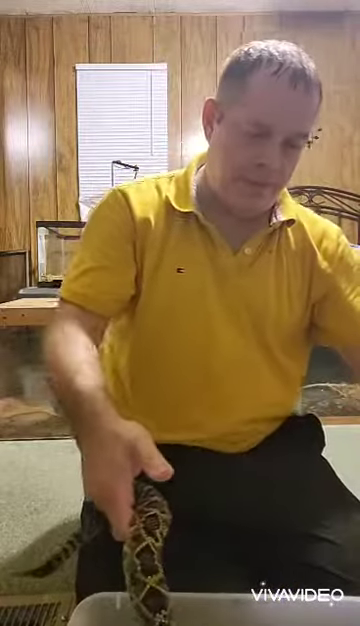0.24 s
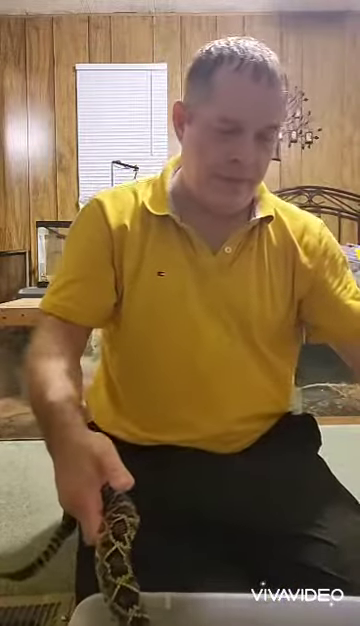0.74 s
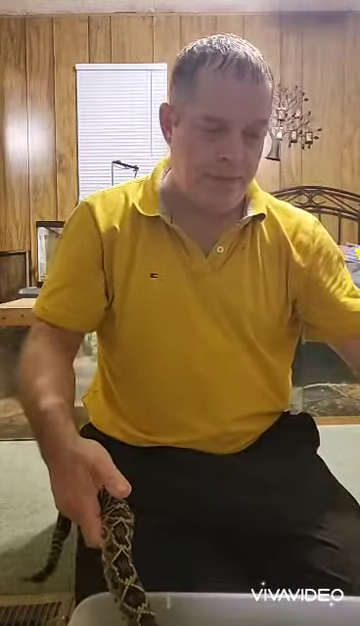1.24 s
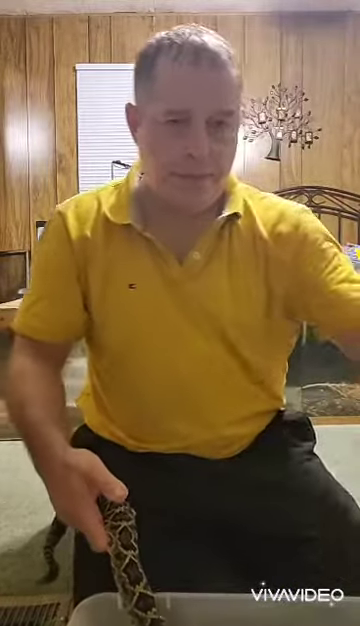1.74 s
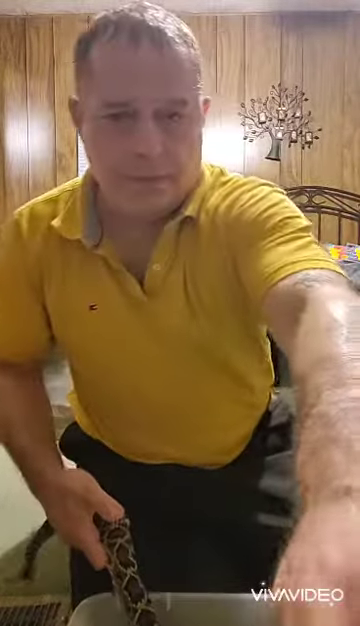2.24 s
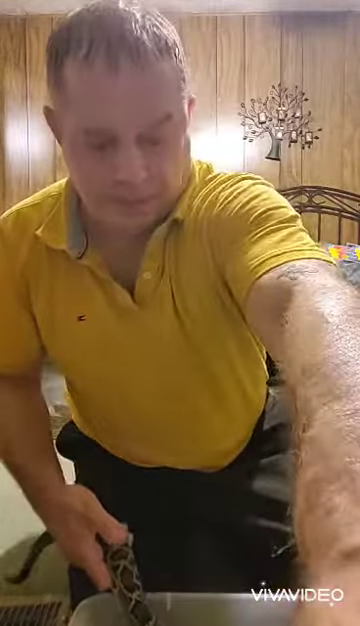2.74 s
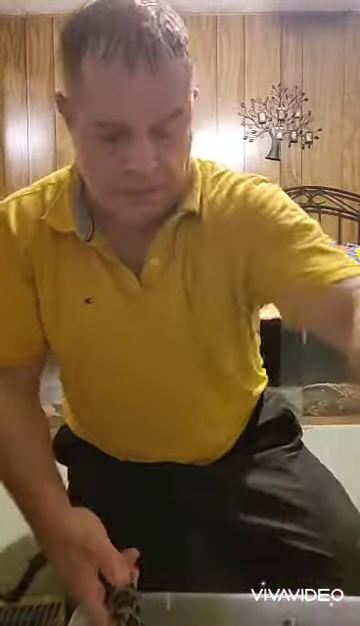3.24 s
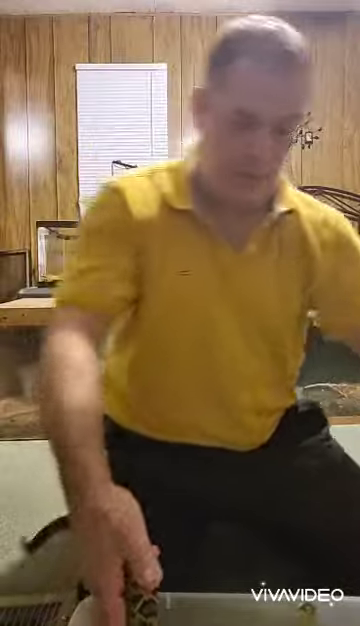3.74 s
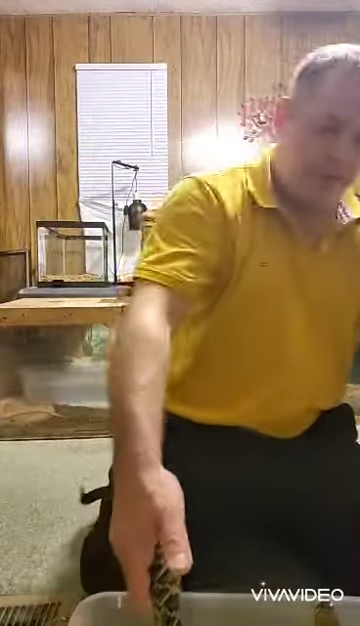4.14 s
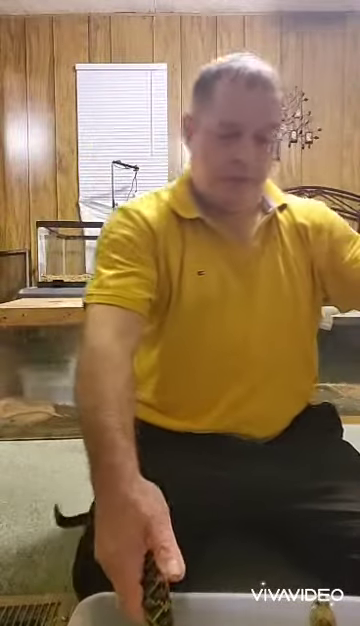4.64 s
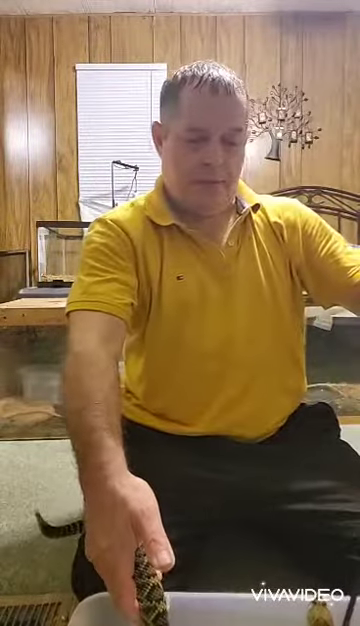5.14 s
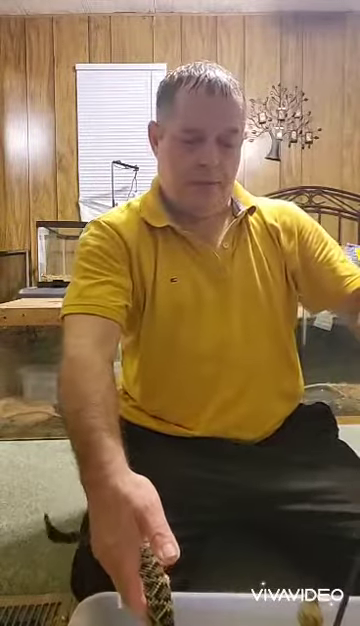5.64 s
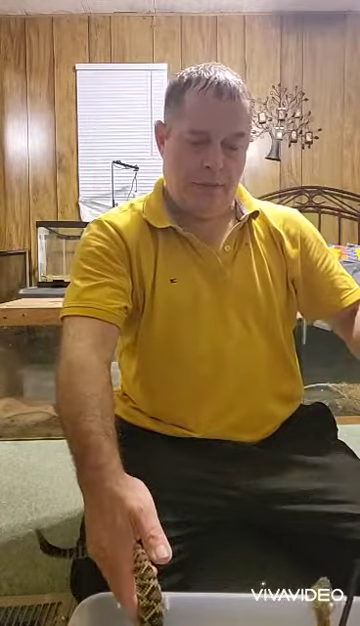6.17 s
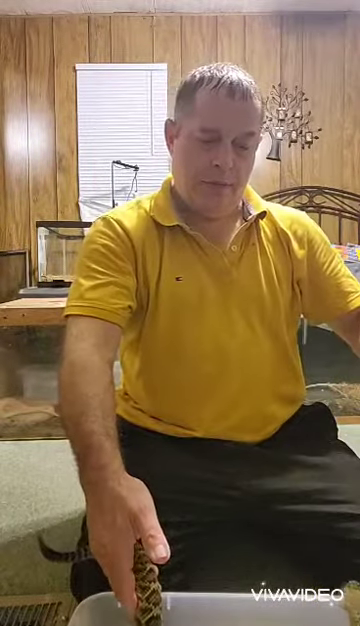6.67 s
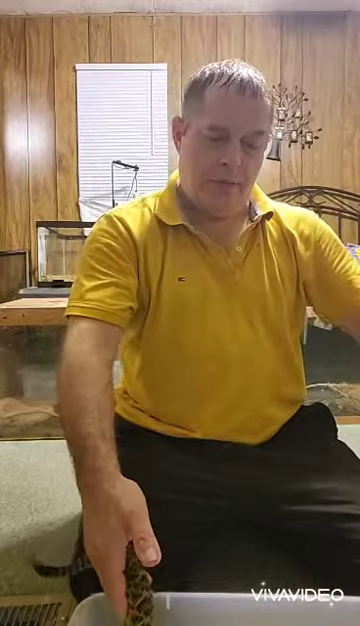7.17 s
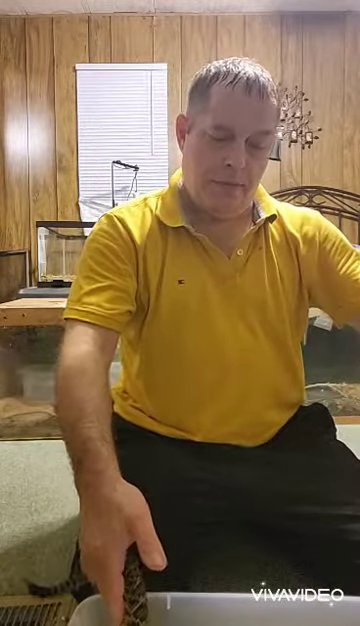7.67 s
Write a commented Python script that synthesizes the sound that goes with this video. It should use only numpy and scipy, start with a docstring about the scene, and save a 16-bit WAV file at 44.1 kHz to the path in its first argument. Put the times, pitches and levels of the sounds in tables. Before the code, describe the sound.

Close stereo pickup indoors: soft drags, dry swishes and light scrapes over low motor rumble, then a sharp hollow plastic knock. The snake's tail twitches, quickly building into a steady bright rattle of about twenty flicks a second, slightly toward the right. Several tub bumps and brief rubs fall under it, then mostly the rattle alone, thinner and less even at the close.

```python
"""Rattlesnake over a plastic tub

A rattlesnake, held over a plastic tub in a small panelled room, starts to rattle.
About twenty tail flicks a second throw loose horny segments together: trains of impacts excite resonances.
Knocks ring the modes of the tub; friction noise makes the drag of sleeve and hand, swishes and scrapes,
then a long faint rustle under the rattle. Machines hum underneath as wavering sines over low rumble."""
import sys
import numpy as np
from scipy import signal
from scipy.fft import rfft, irfft
from scipy.io import wavfile

SR = 44100
rng = np.random.default_rng(int(sys.argv[2]) if len(sys.argv) > 2 else 0)


def unload_wav(signal):
    """Save mono or channel-first audio to the path in sys.argv[1] as 16-bit WAV at rate SR, clipped to [-1, 1]."""
    wavfile.write(
        sys.argv[1],
        SR,
        np.round(np.clip(np.atleast_2d(signal).T, -1, 1) * 32767).astype(np.int16),
    )


N = 348831
TIME = np.arange(N) / SR


def amp(db):
    """Level: decibels to amplitude gain."""
    return 10 ** (np.asarray(db) / 20)


def unit(x):
    """Normalisation: scales to rms 1."""
    return x / np.sqrt(np.mean(x ** 2) + 1e-20)


def read(points, hz):
    """Interpolation: reads a curve on a log-frequency axis."""
    f, value = np.transpose(points)
    return np.interp(np.log(hz + 1), np.log(f + 1), value)


def pan(db):
    """Interaural level difference: left and right gains for left minus right dB."""
    return amp(np.array([[.5], [-.5]]) * db)


def add(mix, s, sound):
    """Superposition: mixes a sound in at time s."""
    part = mix[..., max(round(s * SR), 0):][..., :sound.shape[-1]]
    part += sound[..., :part.shape[-1]]


def drift(hz):
    """Low-pass noise: slow random change of rms 1, up to the given rate."""
    lowpass = 1 + (np.fft.rfftfreq(N, 1 / SR) / hz) ** 4
    return unit(irfft(rfft(rng.standard_normal(N)) / lowpass, N))


def colour(x, points, size=4096):
    """Minimum-phase filtering: a causal filter of energy 1 with the given spectrum."""
    hz = abs(np.fft.fftfreq(size, 1 / SR))
    log_gain = np.log(amp(np.maximum(read(points, hz), -100)))
    spectrum = np.exp(signal.hilbert(log_gain).conj())
    taps = np.fft.ifft(spectrum).real[:size // 2]
    taps = taps[None] / np.linalg.norm(taps)
    return signal.oaconvolve(np.atleast_2d(x), taps, axes=1)[:, :x.shape[-1]]


def tilted(x, tilt_db, pivot_hz=1000):
    """Spectral tilt: brighter or duller by a slope per octave, level outside 200-5000 Hz."""
    hz = np.clip(np.fft.rfftfreq(N, 1 / SR), 200, 5000)
    return irfft(rfft(x) * amp(tilt_db * np.log2(hz / pivot_hz)), N)


def excite(train, ring):
    """Convolution: plays a ring, scaled to energy 1, on every impact of a train."""
    ring = np.atleast_2d(ring)
    ring = ring / np.linalg.norm(ring, axis=1, keepdims=True)
    return signal.oaconvolve(np.atleast_2d(train), ring, axes=1)[:, :N]


# decay of the panelled room: (frequency [Hz], t60 [s])
ROOM_DECAY = [(200, 0.17), (600, 0.15), (1400, 0.15), (4000, 0.22), (9000, 0.23), (15000, 0.22)]


def room(x, wet_db, apart_hz=1100, size=16000):
    """Reverberation: dense reflections decay band by band; both microphones share the bass."""
    taps = rng.standard_normal((2, size)) * (rng.random((2, size)) < .15)
    taps[:, :round(.003 * SR)] = 0  # no reflection in the first 3 ms
    hz, t, bands = signal.stft(taps, SR, nperseg=256)
    same = 1 / (1 + (hz[:, None] / apart_hz) ** 4)
    bands[1] = same * bands[0] + np.sqrt(1 - same ** 2) * bands[1]
    decay = amp(-60 * t / read(ROOM_DECAY, hz)[:, None])
    tail = signal.istft(bands * decay, SR, nperseg=256)[1]
    wet = signal.oaconvolve(x, tail / np.linalg.norm(tail[0]), axes=1)[:, :N]
    return (x + amp(wet_db) * wet) / np.sqrt(1 + amp(wet_db) ** 2)


# diffuse sound at the two microphones: (frequency [Hz], left-right likeness [0-1])
DIFFUSE_LIKENESS = [(60, 1), (600, 0.61), (1200, 0.01), (4000, 0.012)]


def diffuse(x, spectrum):
    """Diffuse-field coherence: two unrelated signals become coloured sound from all round, rms 1."""
    hz = np.fft.rfftfreq(N, 1 / SR)
    a, b = rfft(x)
    same = np.clip(read(DIFFUSE_LIKENESS, hz), 0, 1)
    pair = np.array([a, same * a + np.sqrt(1 - same ** 2) * b])
    return unit(irfft(pair * amp(read(spectrum, hz)), N))


# motor hum: (frequency [Hz], mean amplitude before panning [dB])
HUM_TONES = [(58.3, -47.5), (87.3, -63), (120, -57), (240, -68.5)]
# spectrum of the room's low rumble: (frequency [Hz], relative level per Hz [dB])
RUMBLE_SPECTRUM = [(24, -37), (31, -25), (38, -4.5), (45, 7.5), (58, 1), (70, -1.5), (95, 1.5), (140, -9),
                   (190, -14.5), (280, -15), (360, -29.5), (650, -33), (1100, -33.5), (3000, -41),
                   (15500, -48)]


def machines(rumble_db=-54.5, waver_rad=0.53):
    """Phase modulation: a wavering motor hum over the low rumble of the room."""
    hum = np.zeros(N)
    for hz, db in HUM_TONES:
        level = amp(db + 0.21 * drift(2.0))
        phase = 2 * np.pi * (hz * TIME + rng.random()) + waver_rad * drift(0.82)
        hum += level * np.sin(phase)
    rumble = amp(rumble_db) * diffuse(rng.standard_normal((2, N)), RUMBLE_SPECTRUM)
    return pan(1.65) * (hum + rumble)


# what the tub rings with: (frequency [Hz], relative level [dB], t60 [s])
TUB_MODES = [(228, -25, 0.17), (306, -4.5, 0.041), (476, -17, 0.07), (615, 2, 0.069), (671.5, 2.5, 0.056),
             (819, -8, 0.1), (993, -15, 0.071), (1235, -16.5, 0.1), (1420, -32, 0.05), (1675, -16.5, 0.044),
             (2100, -12.5, 0.068)]


def tub_ring(tilt_db, pivot_hz=615):
    """Modal synthesis: the tub after one blow, brighter or duller by a tilt per octave."""
    t = np.arange(SR // 4) / SR
    ring = np.zeros(len(t))
    for k, (hz, db, t60) in enumerate(TUB_MODES):
        decay = amp(db + tilt_db * np.log2(hz / pivot_hz) - 60 * t / t60)
        ring += decay * np.sin(2 * np.pi * hz * t + k * np.pi)  # signs alternate
    return ring


def slips(per_s, uneven_db):
    """Stick-slip friction: tiny random slips of a surface pressed now harder and now softer."""
    happens = rng.random(N) < per_s / SR
    return rng.standard_normal((2, N)) * happens * amp(uneven_db * drift(24.0))


def strokes(rows, rise_s, fade_s):
    """Amplitude envelope: each stroke sets in, grows steadily stronger or weaker, and dies away."""
    gain = np.zeros(N)
    for start, length, db, change_db in rows:
        t = TIME - start
        rise = np.clip(t / rise_s, 0, 1)
        strength = amp(db + change_db * np.clip(t / length, 0, 1))
        gain += rise * strength * np.exp(-np.maximum(t - length, 0) / fade_s)
    return gain


# hand and sleeve dragging along, then (last two rows) a long faint rustle under the rattle:
# (start [s], length [s], relative level [dB], change over the stroke [dB], brightness [dB per octave])
DRAG_AND_RUSTLE_STROKES = [(0, 0.47, -60.5, -3, 1.5), (0.888, 0.63, -63, -8.5, 0.5),
                           (2.32, 0.18, -61, 1.5, -4), (2.487, 0.76, -45, -10, 2),
                           (3.288, 0.28, -50.5, 6, -1), (3.96, 0.15, -69, 14.5, -1.5),
                           (4.119, 0.14, -50.5, 3, 0.5), (4.781, 0.029, -45, -6, 3),
                           (4.863, 2.21, -68, 4, 2), (7.0, 0.91, -95, 32.5, -1)]
# spectrum of the drag and rustle: (frequency [Hz], relative level per Hz [dB])
DRAG_AND_RUSTLE_SPECTRUM = [(100, 13), (230, 5), (340, 4.5), (470, 8.5), (550, 1), (630, 8), (780, -3),
                            (950, -0.5), (1270, 2), (1750, 4), (2120, 3.5), (2400, -4), (3500, -2),
                            (9000, -13)]


def drag_and_rustle(gain_db=-3.0, ring_db=-7, ring_tilt_db=12, echo_s=0.0044, sway_s=0.000445):
    """Comb filtering: dull rubbing noise, with some tub ringing, meets its own drifting echo."""
    rub = diffuse(slips(per_s=9000, uneven_db=1.2), DRAG_AND_RUSTLE_SPECTRUM)
    ring = unit(excite(slips(per_s=3700, uneven_db=4.5), tub_ring(ring_tilt_db)))
    rub = rub + amp(ring_db) * ring
    delay = echo_s + sway_s * drift(1.0)  # the near reflection shifts slowly
    echo = np.array([np.interp(TIME - delay, TIME, side) for side in rub])
    rub = unit(rub + .3 * echo)
    out = np.zeros((2, N))
    for *row, tilt_db in DRAG_AND_RUSTLE_STROKES:
        out += strokes([row], rise_s=0.021, fade_s=0.07) * tilted(rub, tilt_db)
    return pan(2.5) * amp(gain_db) * out


# dry swishes of cloth and scales: (start [s], length [s], level [dB], change over the stroke [dB])
SWISH_STROKES = [(-.05, 0.37, -62.5, -3.5), (.9, 0.16, -68.5, -3), (1.78, 0.69, -68, -4)]
# spectrum of the swish: (frequency [Hz], relative level per Hz [dB])
SWISH_SPECTRUM = [(2500, -14), (4300, -9), (5200, -0.5), (7600, 5.5), (9500, -19.5), (15500, -5)]


def swish():
    """Friction noise: many light slips of cloth and scales, faint, dry and bright."""
    rub = diffuse(slips(per_s=9000, uneven_db=1.5), SWISH_SPECTRUM)
    return pan(-11.0) * strokes(SWISH_STROKES, rise_s=0.12, fade_s=0.47) * rub


# the snake's body scraping on the rim of the tub: (start [s], length [s],
# relative level [dB], change over the stroke [dB])
SCRAPE_STROKES = [(0, 0.12, -59.5, -9), (.26, 0.061, -64.5, 1.5), (.99, 0.11, -72, 22.5)]
# spectrum of the scrape's noise: (frequency [Hz], relative level per Hz [dB])
SCRAPE_SPECTRUM = [(300, -2), (650, -2), (900, -6), (1200, -15), (1650, -7), (3000, -31)]


def scrape():
    """Friction-excited resonance: slips of the scales ring the tub, with noise beside the ring."""
    ring = unit(excite(slips(per_s=890, uneven_db=5.0)[0], tub_ring(0)))
    rub = diffuse(slips(per_s=1500, uneven_db=2.0), SCRAPE_SPECTRUM)
    return pan(2.5) * strokes(SCRAPE_STROKES, rise_s=0.0061, fade_s=0.057) * (ring + rub)


# knocks on the tub: (time [s], relative level [dB], brightness [dB per octave],
# left minus right [dB], chatter of the contact [s], relative ring of the walls [dB],
# resonance of the struck spot [Hz], height of that resonance [dB])
TUB_KNOCKS = [(0.442, -37.5, -2.5, 6, 0.0093, -18, 925, 21),
              (1.096, -11.5, -1, 1.5, 0.0038, -14.5, 2140, 7),
              (1.112, -25.5, -3.5, -3, 0.004, -17.5, 300, 2), (2.011, -44, -2, 2, 0.0084, -30, 1230, 23),
              (2.466, -28, -2.5, 3, 0.012, -29, 452, 12), (2.496, -25.5, -3.5, 7, 0.012, -24, 1290, 22.5),
              (2.505, -22.5, -3.5, -4, 0.0064, -20, 550, 13), (3.99, -35.5, -11, 2, 0.012, -25, 192, 9),
              (4.148, -17.5, -1.6, 2, 0.0064, -13.5, 990, 6.5), (4.203, -32, 0.5, 1, 0.0097, -22, 1900, 1),
              (4.795, -23, -1.5, 1.5, 0.0097, -20, 1680, 9), (4.8, -32.5, -4, 0, 0.024, -42, 134, 22)]
# spectrum of the contact: (frequency [Hz], relative level per Hz [dB])
CRACK_SPECTRUM = [(100, 4), (300, 5), (850, 2), (1400, -5), (3000, -6), (5000, -4.5), (7800, -6.5),
                  (9500, -32), (15500, -34)]


def knocks(crack_db=-12, spot_octaves=0.26):
    """Impact excitation: a blow cracks on the plastic and rings the walls of the tub."""
    t, rings, cracks = np.arange(SR // 4) / SR, np.zeros((2, N)), np.zeros((2, N))
    hz = np.geomspace(100, 15500, 120)
    for s, db, tilt_db, side_db, crack_s, ring_db, spot_hz, spot_db in TUB_KNOCKS:
        spot = spot_db * np.exp(-(np.log2(hz / spot_hz) / spot_octaves) ** 2)
        shape = read(CRACK_SPECTRUM, hz) + tilt_db * np.log2(hz) + spot
        # partly the same noise on both sides
        noise = rng.standard_normal(len(t)) + .5 * rng.standard_normal((2, len(t)))
        crack = colour(noise * np.exp(-t / crack_s), list(zip(hz, shape)))
        add(cracks, s, amp(db + crack_db) * pan(side_db) * crack)
        add(rings, s, amp(db + ring_db) * pan(side_db) * tub_ring(tilt_db))
    return room(cracks, wet_db=4.0) + room(rings, wet_db=-13.5)


# single hard clacks of the segments: (time [s], relative peak level [dB])
SEGMENT_CLACKS = [(2.7282, -22), (2.7816, -31), (3.2562, -31), (3.3405, -22), (3.387, -27), (5.3146, -27)]
# resonances of the hollow segments: (frequency [Hz], relative level [dB])
HOLLOW_MODES = [(6600, -8), (7250, -19), (7700, -5.5), (8100, -9)]


def clacks(gain_db=1.0, rise_s=0.00044, ring_s=0.00093, side_db=-5.0):
    """Damped resonance: now and then two segments meet squarely and ring in one hard clack."""
    t, out = np.arange(SR // 100) / SR, np.zeros((2, N))
    ring = sum(amp(db) * np.sin(2 * np.pi * hz * t) for hz, db in HOLLOW_MODES)
    ring = ring * np.minimum(t / rise_s, 1) * np.exp(-t / ring_s)
    for s, db in SEGMENT_CLACKS:
        add(out, s, amp(db + gain_db) * pan(side_db) * ring / abs(ring).max())
    return room(out, wet_db=-14.0)


def collisions(power, per_s, spread_db):
    """Random impact process: uneven intervals and strengths with the given mean power."""
    gap, strength = rng.random((N // 8, 2)).T
    at = ((np.arange(len(gap)) + gap) * SR / per_s).astype(int)
    force = unit(amp(spread_db * np.minimum(-np.log(1 - strength), 3)))
    impacts = np.bincount(at[at < N], force[at < N], N)
    return impacts * np.sqrt(power * SR / per_s)


def spray_power(clatter_s=0.019, snap=2.4, snap_s=0.0069, rise_s=0.0064,
                rebound_s=0.027, rebound_db=-14.5):
    """Energy envelope: hits are hardest as the tail turns, clatter on, and return weaker on the rebound."""
    t = np.arange(SR // 5) / SR
    clatter = np.exp(-2 * (t / clatter_s) ** 2)
    turn = snap * np.exp(-t / snap_s)
    rebound = amp(rebound_db) ** 2 * np.exp(-((t - rebound_s) / snap_s) ** 2)
    return (clatter + turn + rebound) * np.minimum(t / rise_s, 1) ** 5


# flicks of the tail, from the first twitches to the last falters: (time [s], relative level [dB])
TAIL_FLICKS = [(2.08, -35), (2.144, -46.5), (2.187, -43), (2.232, -32.5), (2.282, -29.5), (2.338, -29.0),
               (2.388, -29.5), (2.439, -29.5), (2.494, -33.5), (2.532, -30.5), (2.573, -28.5), (2.623, -26),
               (2.678, -29), (2.718, -27), (2.774, -30), (2.811, -31.5), (2.864, -29.5), (2.921, -33),
               (2.971, -32), (3.012, -30), (3.056, -33.0), (3.095, -31.0), (3.14, -29), (3.2, -31),
               (3.237, -28.0), (3.284, -29.5), (3.329, -30), (3.373, -30.5), (3.42, -31.0), (3.469, -31),
               (3.519, -31.5), (3.565, -31.5), (3.61, -33), (3.677, -33.5), (3.728, -35), (3.771, -35.5),
               (3.821, -28.5), (3.871, -31.5), (3.91, -30.5), (3.951, -32.5), (4, -31.5), (4.049, -30),
               (4.12, -31), (4.165, -35.5), (4.206, -28.5), (4.263, -31), (4.294, -34.5), (4.36, -29.5),
               (4.414, -35.5), (4.44, -30.5), (4.487, -30.5), (4.546, -29.5), (4.595, -31.5),
               (4.633, -30.5), (4.689, -29.5), (4.734, -29.5), (4.782, -30), (4.832, -31.5), (4.88, -30.5),
               (4.929, -32.5), (4.978, -33), (5.021, -28.5), (5.074, -29.5), (5.131, -33.5), (5.157, -30),
               (5.214, -28.5), (5.283, -28.0), (5.336, -29.5), (5.381, -31), (5.433, -29.5), (5.498, -27),
               (5.551, -31), (5.605, -29.5), (5.666, -31), (5.71, -37), (5.749, -33.5), (5.785, -32.5),
               (5.83, -34), (5.893, -30.5), (5.939, -32.5), (5.984, -30), (6.044, -31.5), (6.094, -29.0),
               (6.138, -32.5), (6.192, -31.5), (6.239, -29.5), (6.288, -31.5), (6.344, -34.0), (6.378, -29),
               (6.423, -31.5), (6.468, -31.5), (6.54, -35.0), (6.584, -30.5), (6.641, -32.5),
               (6.681, -29.5), (6.741, -35.0), (6.78, -33.5), (6.828, -31.5), (6.876, -32.5),
               (6.935, -27.5), (6.989, -31.0), (7.037, -43), (7.087, -35.5), (7.117, -49.0), (7.182, -33),
               (7.239, -35.5), (7.296, -30.5), (7.359, -51), (7.397, -33), (7.45, -35), (7.503, -34.5),
               (7.564, -36.5), (7.622, -40.0), (7.671, -32.0), (7.73, -35.5), (7.797, -34), (7.851, -32.5)]
# dry ticks of horn on horn: (frequency [Hz], relative level per Hz [dB])
TICK_SPECTRUM = [(1200, -14.5), (2700, -33), (3400, -27.5), (4100, 0), (5200, -1), (6500, 5.5),
                 (7800, 14.5), (8700, 3.5), (10000, 2), (11000, -4), (13600, 2), (15500, 1.5)]
# stereo balance of the rattle: (frequency [Hz], left minus right [dB])
RATTLE_BALANCE = [(3500, 0), (6400, -8), (8300, -6.5), (10500, 1.5), (13000, -1), (14500, -7)]


def rattle(detune=0.025, ring_s=0.0024, lowest_hz=3000, gain_db=-2.5,
           lead_s=.000145, swing_s=.00002, places=9):
    """Impact-excited resonance: flicks spray fine ticks and harder blows that ring hollow segments."""
    t, out = np.arange(SR // 100) / SR, np.zeros((2, N))
    spray = spray_power()
    for place in range(places):  # the tail's place changes from flick to flick
        # the right microphone is nearer, by more or less as the tail swings
        lead = lead_s + swing_s * np.sin(2 * np.pi * place / places)
        late = np.maximum(t - np.array([[lead], [0]]), 0)
        contact = np.diff(late > 0, axis=1).astype(float)  # one click, as each microphone gets it
        tick = colour(contact, TICK_SPECTRUM)
        power = np.zeros(N)
        for s, db in TAIL_FLICKS[place::places]:
            add(power, s, amp(db) ** 2 * spray)
        dry = excite(collisions(power, per_s=3000, spread_db=5.0), tick)
        for hz, db in HOLLOW_MODES:
            mode_hz = hz * (1 + detune * (2 * rng.random() - 1))
            ring = np.sin(2 * np.pi * mode_hz * late) * np.exp(-late / ring_s)
            dry = dry + amp(db) * excite(collisions(power, per_s=420, spread_db=4.5), ring)
        out += room(dry, wet_db=2.5)  # every place has its own reflections
    # the rattle keeps no sound below about 3 kHz
    out = signal.sosfilt(signal.butter(6, lowest_hz, "highpass", fs=SR, output="sos"), out)
    balance = pan(read(RATTLE_BALANCE, np.fft.rfftfreq(N, 1 / SR)))
    return amp(gain_db) * irfft(rfft(out) * balance, N)


def scene():
    """Superposition: room, rubbing, tub and snake sound together."""
    rubbing = drag_and_rustle() + swish() + scrape()
    return machines() + rubbing + knocks() + clacks() + rattle()


def record(dry, bass_cut_hz=38, edge_hz=15560):
    """Band limiting: the recorder's bass cut and upper edge."""
    dry = signal.sosfilt(signal.butter(8, bass_cut_hz, "highpass", fs=SR, output="sos"), dry)
    lowpass = signal.firwin(401, edge_hz, window=("kaiser", 8), fs=SR)
    return signal.oaconvolve(dry, lowpass[None], "same")


dry = scene()
out = record(dry)
unload_wav(out)
```